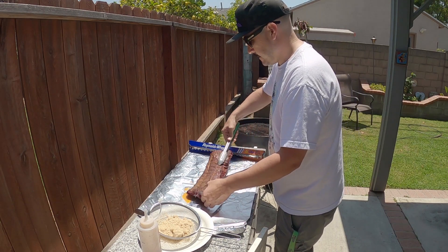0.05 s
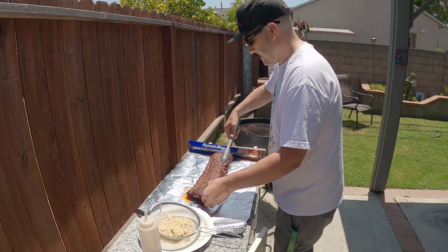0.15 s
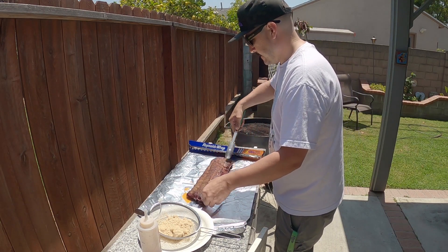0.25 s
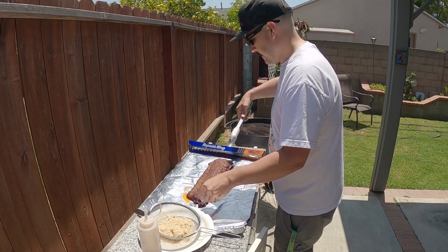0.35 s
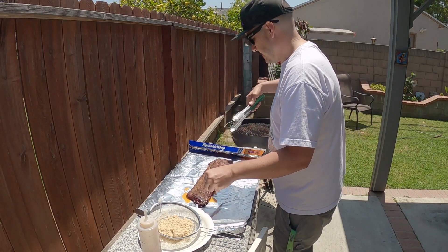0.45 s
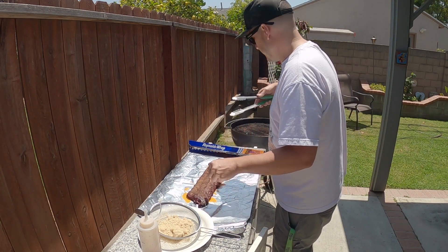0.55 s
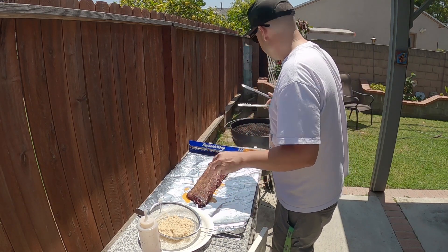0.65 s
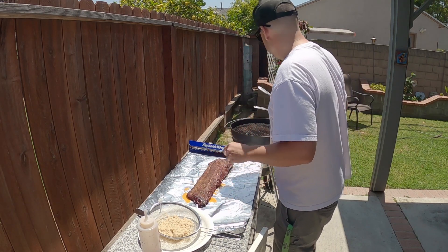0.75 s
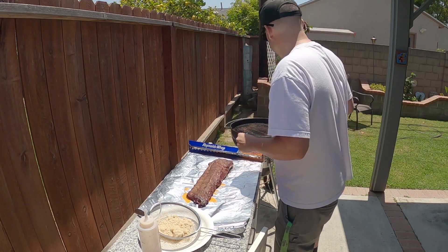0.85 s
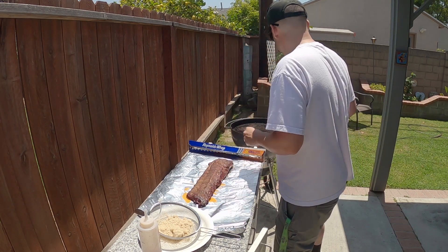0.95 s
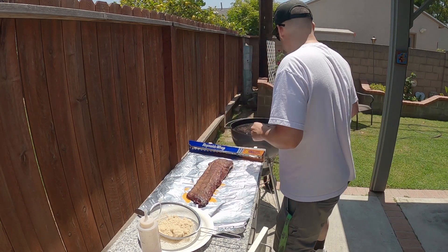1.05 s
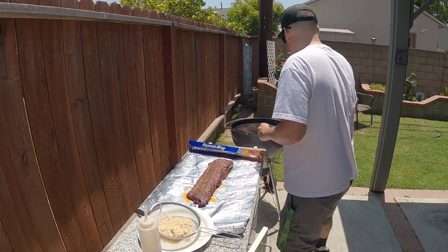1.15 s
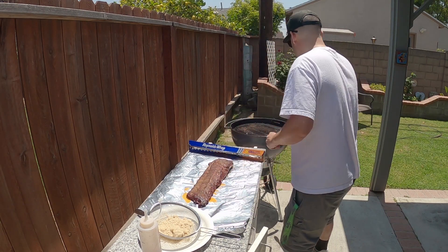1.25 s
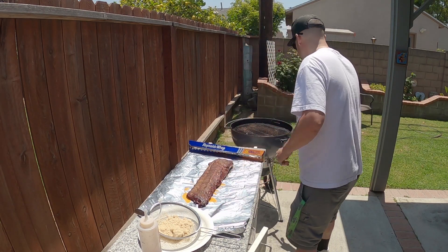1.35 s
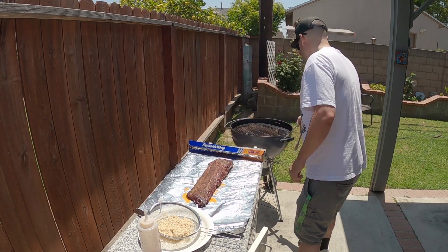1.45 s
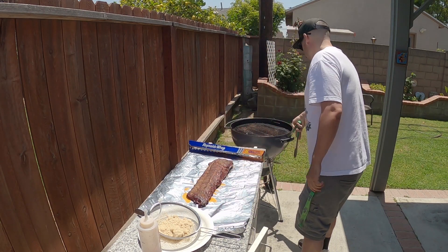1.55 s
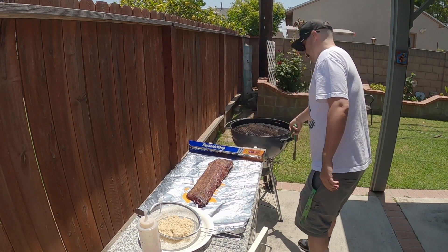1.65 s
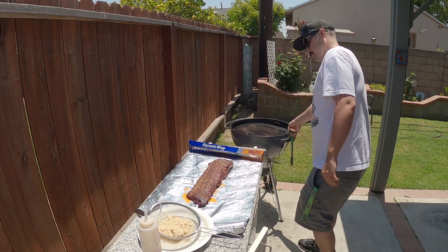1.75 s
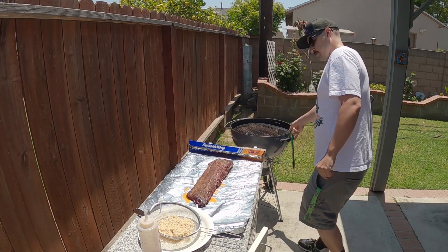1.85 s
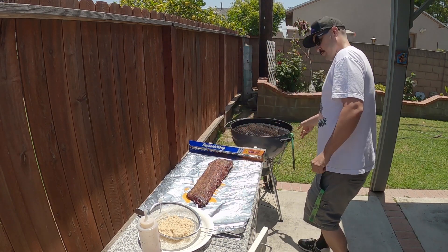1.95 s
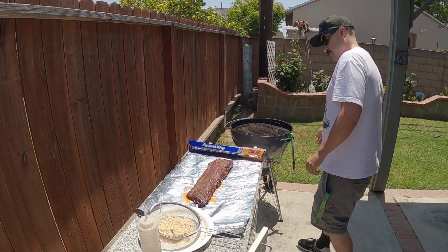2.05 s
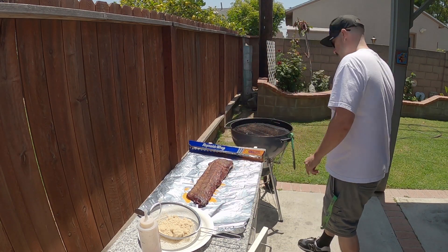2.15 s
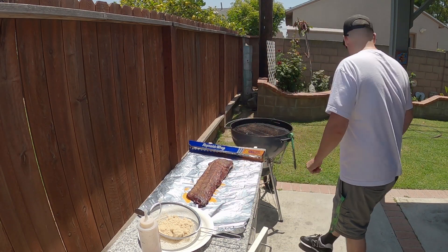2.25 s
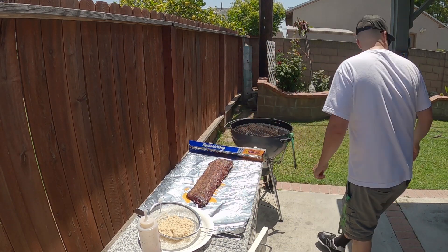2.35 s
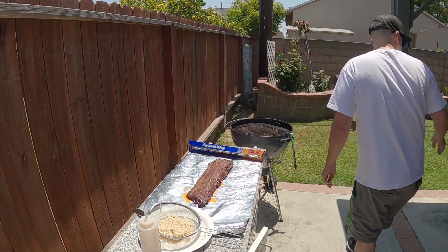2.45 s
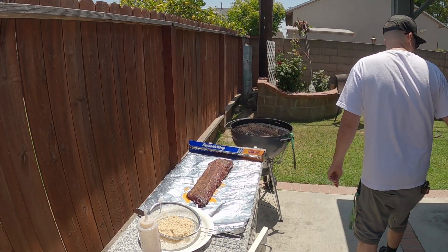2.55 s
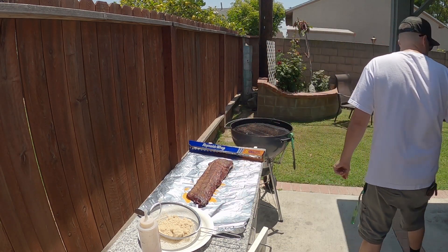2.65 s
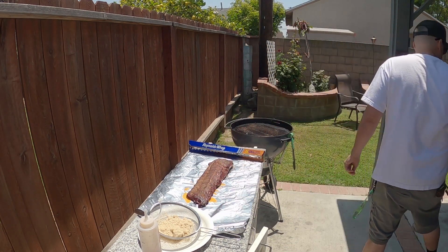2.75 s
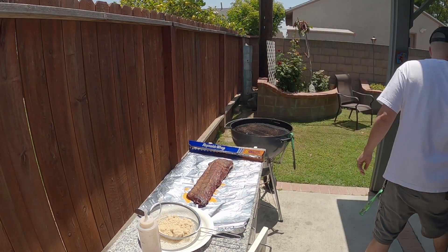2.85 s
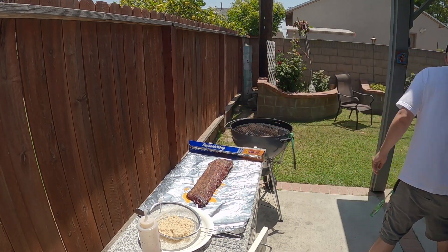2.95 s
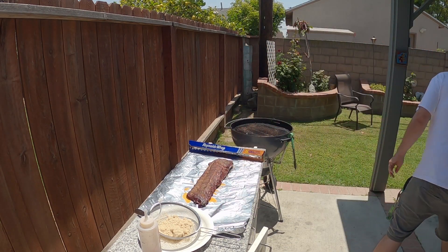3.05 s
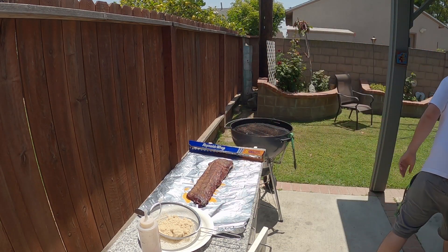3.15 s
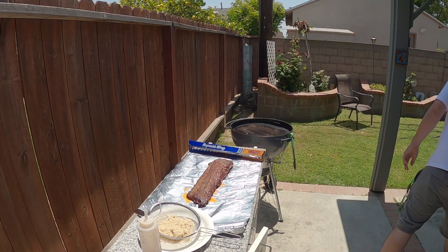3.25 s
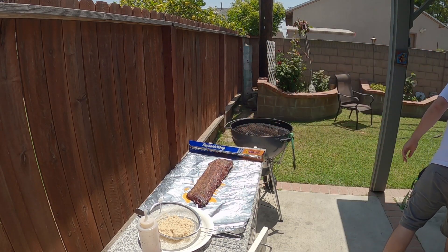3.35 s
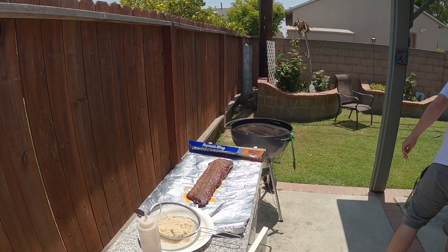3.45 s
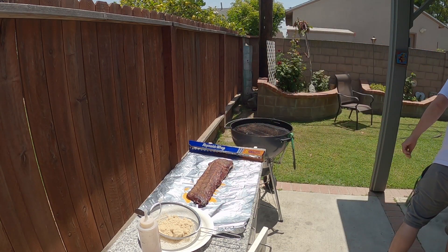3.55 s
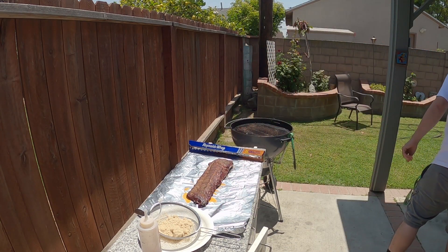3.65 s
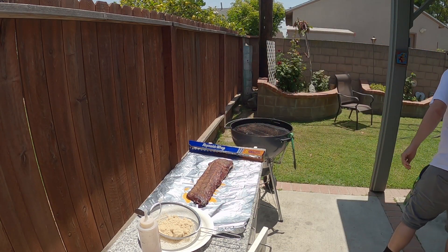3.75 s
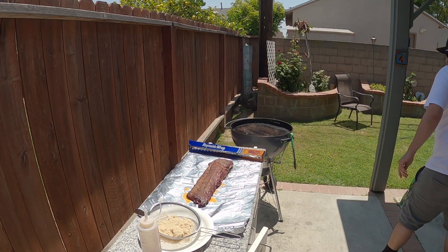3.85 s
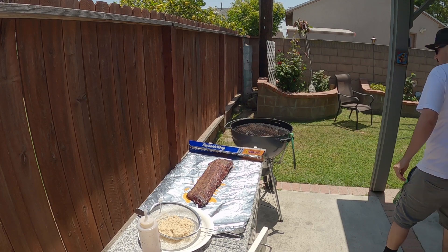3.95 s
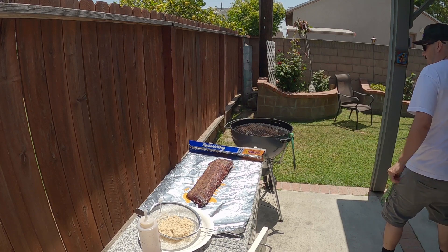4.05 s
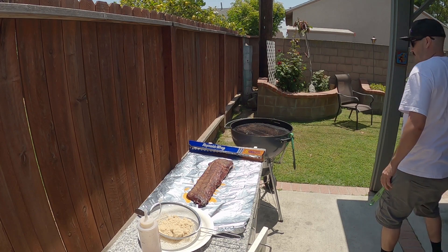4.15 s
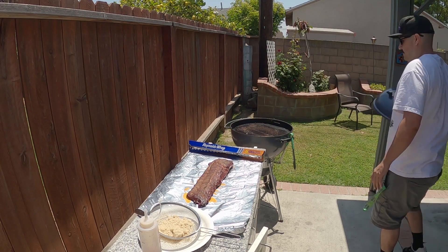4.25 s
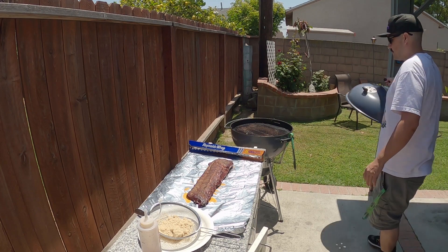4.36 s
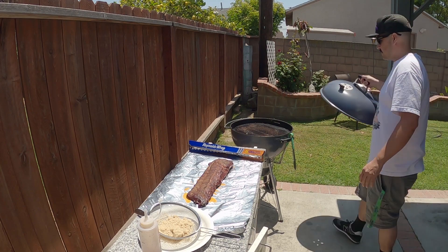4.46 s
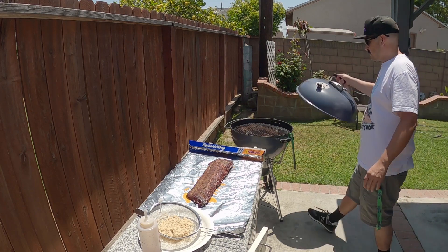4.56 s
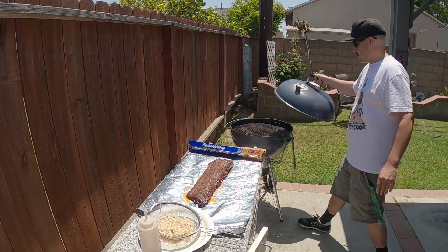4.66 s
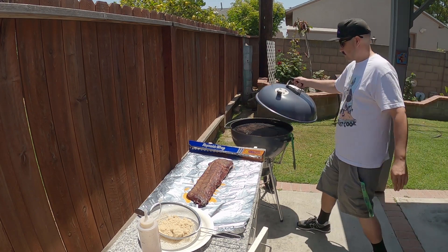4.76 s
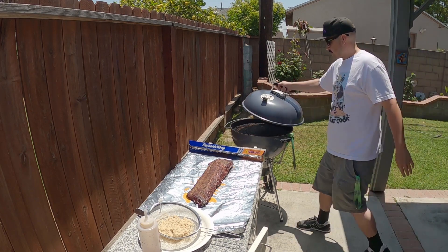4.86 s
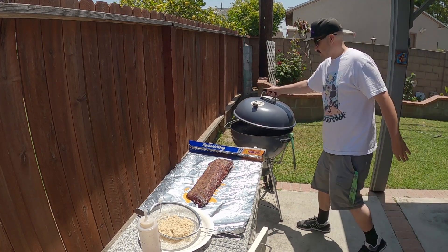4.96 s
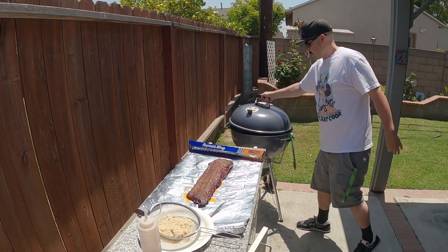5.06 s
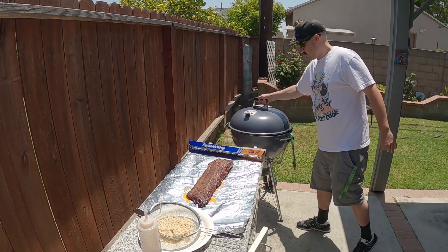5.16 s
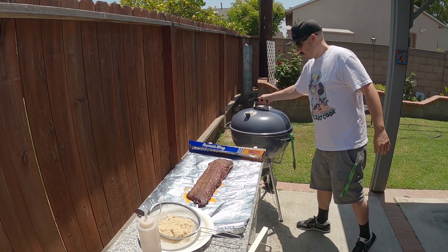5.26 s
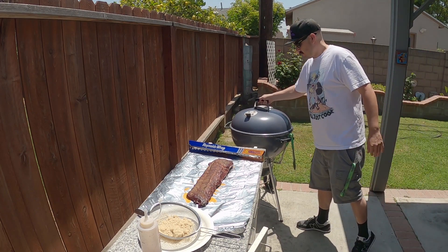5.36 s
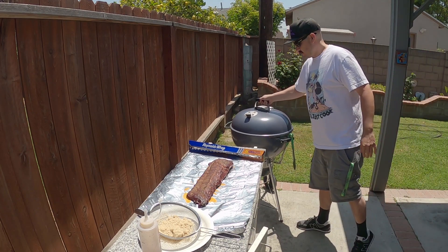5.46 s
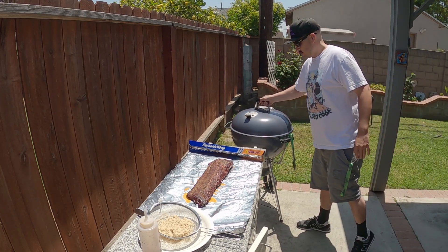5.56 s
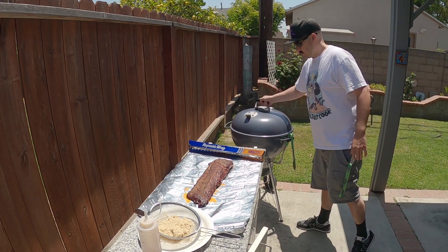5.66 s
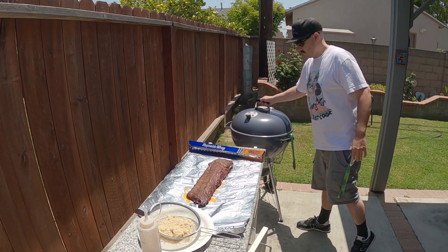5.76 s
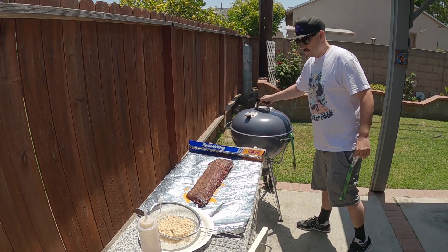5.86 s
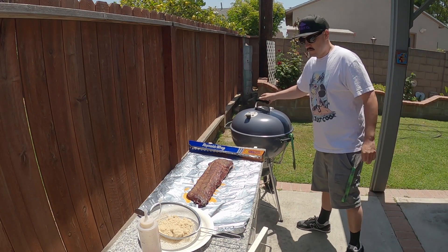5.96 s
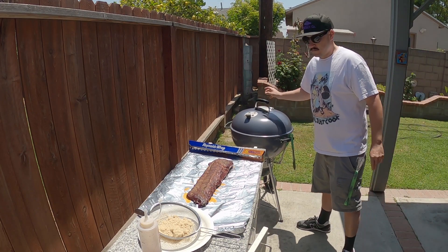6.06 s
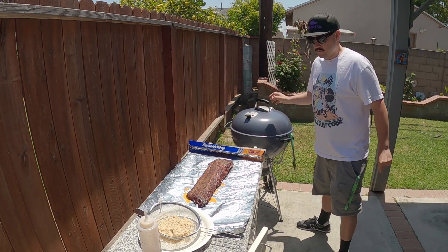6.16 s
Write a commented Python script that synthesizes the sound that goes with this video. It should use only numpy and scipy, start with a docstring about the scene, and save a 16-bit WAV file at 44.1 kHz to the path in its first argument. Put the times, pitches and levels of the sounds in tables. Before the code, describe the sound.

A short crinkle and scrape of foil is followed by a cluster of light, ringing clinks from tongs touching a grill. A quieter stretch holds only soft shoe and clothing scuffs and the low outdoor hum of far traffic and a machine. Then comes the loudest sound, a metal lid clanking onto the grill, rattling on its rim and rubbing faintly into place. The microphone is nearby on a patio.

```python
"""A backyard beside a wooden fence, a close-set microphone pair near a kettle grill. Foil crackles under
a piece of meat and a blade drags over it; steel tongs are hung on the grill and clink, ringing grate
and bowl. Shoes and cloth scuff softly, then the steel lid lands on the bowl, rocks on its rim and
settles. Distant traffic, a machine and air hum throughout; fence and patio throw back a short echo."""
import sys
import numpy as np
from scipy import signal
from scipy.fft import rfft, irfft
from scipy.io import wavfile
from scipy.ndimage import uniform_filter1d

SR = 44100
rng = np.random.default_rng(int(sys.argv[2]) if len(sys.argv) > 2 else 0)


def to_wav(sig):
    """Store sig (one row per channel, or 1-D mono) as 16-bit WAV at the path in sys.argv[1].

    Samples outside -1..1 are clipped; the rate is SR.
    """
    pcm = np.clip(np.atleast_2d(sig), -1, 1) * 32767
    pcm = np.round(pcm).astype(np.int16)
    wavfile.write(sys.argv[1], SR, pcm.T)  # frames by channels


N = 273930

# Far traffic and air. Each row: frequency in Hz, relative level in dB.
AIR_SPECTRUM = [(12, -41), (20, -4), (64, -1), (174, -11), (249, -13), (310, -19.5), (497, -21.5),
                (603, -25), (674, -26), (1310, -26), (6360, -47), (10500, -64.5), (12400, -70),
                (13400, -96), (15000, -100)]
# Traffic swelling and sinking. Each row: time in seconds, level in dB (about half the swing is used).
TRAFFIC_LEVEL = [(0.0, -30.5), (0.79, -32), (1.76, -30), (3.32, -29.5), (3.6, -30), (4.1, -29),
                 (5.3, -29.5), (5.91, -33.5), (6.21, -31.5)]
# The air at the two microphones. Each row: frequency in Hz, left-right likeness (below 0 counts as 0).
AIR_LIKENESS = [(60, 1), (180, 0.98), (550, 0.95), (1650, 0.74), (4970, 0.86), (15000, -1.2)]
# Phase of the air. Each row: frequency in Hz, lead of the left side in radians.
AIR_LEAD = [(60, 0.12), (3000, -0.24), (8000, 0.11)]
# Balance of the air. Each row: frequency in Hz, left minus right in dB.
AIR_BALANCE = [(60, 0.5), (1000, -2), (4000, 2), (15000, -0.5)]
# A distant machine. Each row: frequency in Hz, width in Hz, height over the air in dB.
MACHINE_HUM = [(41.88, 4.54, 9.), (81.6, 3.8, 3.5), (256.1, 7.2, 9), (605, 18, 8)]
# Rustling foil. Each row: frequency in Hz, relative level in dB.
FOIL_SPECTRUM = [(240, -35), (400, 1), (481, -16), (519, -13), (738, -8), (1150, 10.5), (1630, -2),
                 (3790, 3.5), (7790, -7), (15500, -33.5)]
# The foil is pushed, then the blade drags.
# Each row: peak time in seconds, level in dB, rise and fall in dB per second.
FOIL_PUSHES = [(0.0, -40.5, 200, 120), (0.085, -40, 150, 350), (0.198, -44.5, 160, 70),
               (0.28, -44, 1000, 360), (0.333, -36.5, 250, 450), (0.428, -32, 340, 394),
               (0.528, -17, 265, 328), (0.574, -32.5, 300, 150)]
# Single creases snapping. Each row: start in seconds, level in dB, centre in Hz.
CREASE_SNAPS = [(0.015, -26, 3480), (.058, -40, 7000), (.091, -39, 7950), (0.14, -33, 4000),
                (0.165, -33, 5000), (.188, -22.5, 4570), (0.216, -26, 4100), (.276, -26, 7500),
                (.308, -36, 4000), (0.32, -25, 5030), (.379, -34, 2000), (.395, -32, 7000),
                (0.41, -23.5, 2000), (0.47, -18, 4000), (0.483, -15, 5040), (.504, -10, 1470),
                (.528, -14, 4000)]
# Tongs touching the grill. Each row: start in seconds, crack level in dB, crack centre in Hz,
# then in dB the tongs' level, the boosts of their arm mode and tips, the grate's level, the bowl's level.
TONG_TOUCHES = [(1.527, -38, 2880, -59, 0., 0., -56, -65), (1.685, -24, 6100, -57.5, 6., 8., -33, -39),
                (1.705, -32, 4000, -70, 0., 0., -41.5, -46), (1.73, -44, 1200, -70, 0., 0., -42.5, -39),
                (1.752, -35, 8000, -57, 36., 20, -47, -57), (1.792, -27, 4440, -39, 11, -11, -44, -34),
                (1.815, -42, 3000, -44, 11, -14, -55, -41), (1.926, -25.5, 6000, -19, -1.5, -3.5, -53, -63),
                (1.978, -30.5, 1200, -72, 0., 0., -45, -36), (1.987, -25, 7000, -26, 11, -11., -55, -43),
                (2.03, -48, 800, -70, 0., 0., -55, -33.5), (2.045, -35, 700, -70, 0., 0., -60, -29.5),
                (2.075, -38, 700, -61, 0., 0., -59, -35), (2.1, -38, 600, -70, 0., 0., -58, -39)]
# Modes of tongs, grate and bowl. Each row: frequency in Hz, level in dB, t60 in seconds.
TONG_MODES = [(2600, -20, .08), (2630, -10, 0.14), (2920, -0.5, 0.069), (3040, -5, 0.19), (3115, -4, 0.16),
              (3187, 7, 0.049), (3306, -4, 0.05), (3550, -22, 0.13), (4630, -25.5, 0.35), (6900, -19, 0.18),
              (7460, -31, .1), (9500, -36, 0.13), (10800, -46, .06)]
GRATE_MODES = [(1169, 6.5, 0.084), (1257, 5.5, 0.053), (1415, -3, 0.079), (1910, 2.5, 0.066),
               (2300, -17, 0.11), (2760, -10, 0.19), (3140, -18, 0.19), (3640, -3, .08), (3840, -10, 0.13),
               (4040, -5, 0.087), (4860, -23, .1), (5370, -5, .12), (6100, -18, .08), (8000, -16, 0.07)]
BOWL_MODES = [(207, 0.5, 0.3), (500, -2, 0.14), (570, -2.5, 0.2), (652, 0, 0.16), (770, 6, 0.11)]
# Shoes and cloth. Each row: start in seconds, level in dB, centre in Hz, length in seconds.
SOFT_SCUFFS = [(2.45, -59.5, 6000, .05), (3.088, -35, 1600, 0.0065), (3.244, -46.5, 5970, 0.072),
               (4.132, -46, 6000, .04), (4.265, -48, 7000, 0.022), (4.986, -43, 4900, 0.098),
               (5.253, -36, 1200, 0.032)]
# The lid striking the rim. Each row: start in seconds, then force, boom and treble in dB.
LID_BLOWS = [(5.3028, 2, -2.5, 7.5), (5.318, -12, 1, 11), (5.334, -8.5, 14, 6), (5.361, 3.5, 1, 4),
             (5.385, -4, 8, 0.), (5.41, -4, 11.5, -9), (5.446, -11, -9, 9), (5.459, -0.5, -14, -1),
             (5.472, -5, 9, -2), (5.497, -10.5, 9.5, -16), (5.525, -14., 6, -19)]
# Lid modes. Each row: frequency in Hz, t60 in seconds, levels in dB when struck at rim places 0, 1, 2.
LID_MODES = [(140, 0.29, -26, -17.5, -15.5), (175.3, 0.33, -7, -20, -20.5), (195, 0.23, -12.5, -17.5, -19),
             (272.3, 0.2, -19, -9, -31), (346, 0.087, -10.5, -18, -24), (475.6, 0.11, -11.5, -19.5, -23),
             (605, 0.053, -17, -20, -47), (806.5, 0.22, -32, -29, -22), (974, 0.32, -38, -27, -32.5),
             (1238, 0.45, -43, -49, -29.5), (1437, 0.4, -57, -27, -27), (1607, 0.2, -48, -31, -30),
             (1663, 0.58, -45, -37, -21), (1833, 0.28, -24.5, -31, -40), (1939, 0.6, -36, -15, -33),
             (1954, 0.45, -39, -22, -32), (2200, 0.41, -30, -29.5, -42), (2440, 0.16, -16.5, -25.5, -41),
             (2667, 0.53, -32, -31, -37), (2730, 0.28, -34, -35, -47), (2930, 0.53, -34, -23, -28.5),
             (3040, 0.23, -22, -37, -45), (3080, 0.068, -31, -40, -17), (3140, 0.21, -23, -29, -43),
             (3430, 0.33, -30, -34, -38), (3623, 0.18, -31, -37, -28.5), (3840, 0.3, -37, -31, -39),
             (4104, 0.37, -27, -51, -40), (4800, 0.23, -32, -43.5, -50), (5180, 0.17, -37, -40, -50),
             (5380, .08, -29, -41, -33), (5540, .05, -36, -48, -28), (5720, .08, -35, -45, -34),
             (5940, 0.19, -42, -46, -45), (6150, 0.22, -38, -48, -45)]
# The crash, the lid's crowd of weaker modes. Each row: frequency in Hz, relative level in dB.
CRASH_SPECTRUM = [(190, -33), (330, 2), (971, -19), (1040, -16.5), (1910, -11), (2320, -12), (3050, -5),
                  (4340, -19.5), (5350, -21.5), (15500, -57)]
# Decay of the crash. Each row: frequency in Hz, t60 in seconds.
CRASH_T60 = [(150, 0.47), (500, 0.16), (1500, 0.44), (3000, 0.2), (6000, 0.23), (12000, 0.2)]
# Rims grinding. Each row: peak time in seconds, level in dB, rise and fall in dB per second.
RIM_RUBS = [(5.5, -52, 400, 110), (5.66, -52.5, 60, 44), (5.728, -45, 900, 100), (5.765, -43, 200, 400)]
# Colour of the microphone pair. Each row: frequency in Hz, left minus right in dB.
MIC_BALANCE = [(60, 0.9), (300, 1), (2400, 1.), (5000, -1), (9000, -1)]
# Phase of the pair. Each row: frequency in Hz, lag of the left side in radians.
MIC_LAG = [(300, 0.058), (3000, 0.64), (5500, 1.51), (9000, 0.63), (12000, 1.5)]

BRIGHTEN, PLAIN_DB = 0.24, -39.5  # louder rustle is brighter: dB per octave for each dB over PLAIN_DB
TONGS_FREE_S, GRILL_FREE_S, LID_FREE_S = 0.057, .04, 0.082  # free ring before contact chokes it
FIRST_PLACE, ROLL_PER_S = 0.25, 10.8  # the lid's contact rolls round the rim towards place 2
CRASH_DB, CRASH_SHARE = -12.5, 0.31  # the share is dB of crash for each dB of force
SEATED_S, CRASH_FALL_DB_PER_S = 5.465, 300  # the crash fades once the lid is seated
KNOCK_DB, KNOCK_HZ, KNOCK_T60_S = -11, 480, 0.036  # the dull knock of rim on rim
SNAP_T60_S = 0.042
BASS_CUT_HZ, BAND_LIMIT_HZ = 20.0, 15750


def amp(db):
    """Decibels to gain."""
    return 10 ** (np.asarray(db) / 20)


def unit(x):
    """Scales to rms 1."""
    return x / np.sqrt(np.mean(x ** 2) + 1e-20)


def read(points, hz):
    """A spectrum table read on a log-frequency axis."""
    f, value = np.transpose(points)
    return np.interp(np.log(hz + 1), np.log(f + 1), value)


def add(mix, s, sound):
    """Mixes a sound in at time s."""
    part = mix[round(s * SR):][:len(sound)]
    part += sound[:len(part)]


def hump(centre_hz, narrow_db):
    """A dB curve round one pitch, about narrow_db down an octave away, steeper in the top treble."""
    return lambda f: -narrow_db * np.log2(f / centre_hz + 0.015) ** 2 - 13.3 * (f / 10000) ** 2


def swells(rows, t):
    """Level in dB of overlapping swells, each rising and falling at its own speed."""
    at, db, rise, fall = np.transpose(rows)[:, :, None]
    gains = amp(db - np.maximum(rise * (at - t), fall * (t - at)))
    return 10 * np.log10(np.sum(gains ** 2, axis=0) + 1e-30)


def burst(shape_db, t60, seconds):
    """Coloured noise that starts at once and dies away; t60 is one time or a table of (Hz, seconds)."""
    t = np.arange(round(seconds * SR)) / SR
    hz, frame_s, z = signal.stft(rng.standard_normal(len(t)), SR, nperseg=256, noverlap=192)
    band_t60 = t60 if np.isscalar(t60) else read(t60, hz)[:, None]
    z = z * unit(amp(shape_db(hz)))[:, None] * amp(-60 * frame_s / band_t60)
    noise = signal.istft(z, SR, nperseg=256, noverlap=192)[1][:len(t)]
    return noise * np.minimum(t / 0.0015, 1) / 1.92  # peaks near 1


def ring(hz, db, t60, free_s, choked_t60, rise_s=0.00052):
    """Decaying modes struck together, neighbours in opposite sense, choked after free_s."""
    t = np.arange(round(.6 * SR)) / SR
    modes = amp(db - 60 * t[:, None] / t60) * np.sin(2 * np.pi * hz * t[:, None])
    signs = (-1.) ** np.arange(len(hz))
    choke = amp(-60 * np.maximum(t - free_s, 0) / choked_t60)
    return (modes @ signs) * choke * np.minimum(t / rise_s, 1)


def yard_air():
    """Far traffic, air and machine hum: drifting noise, its bass nearly alike at both microphones."""
    frames, hz = N // 1024 + 9, np.fft.rfftfreq(8192, 1 / SR)
    left_re, left_im, apart_re, apart_im, patches = rng.standard_normal((frames, 4097, 5)).T
    left, apart = left_re + 1j * left_im, apart_re + 1j * apart_im
    alike = np.clip(read(AIR_LIKENESS, hz), 0, 1)[:, None]
    right = alike * left * np.exp(-1j * read(AIR_LEAD, hz))[:, None] + np.sqrt(1 - alike ** 2) * apart
    side = amp(read(AIR_BALANCE, hz) / 2)[:, None]
    hum_db = sum(db / (1 + (2 * (hz - f) / width) ** 2) for f, width, db in MACHINE_HUM)
    colour_db = (read(AIR_SPECTRUM, hz) + hum_db)[:, None]
    drift_db = 1.06 * unit(uniform_filter1d(uniform_filter1d(patches, size=40, axis=0), size=5, axis=1))
    at, level_db = np.transpose(TRAFFIC_LEVEL)
    swell_db = np.interp(np.arange(frames) * 1024 / SR, at, level_db - level_db.mean())
    share = read([(200, 0.56), (1000, 0.42)], hz)[:, None]  # the rumble swells most
    z = np.array([left * side, right / side]) * amp(colour_db + drift_db + share * swell_db)
    return amp(level_db.mean()) * unit(signal.istft(z, nperseg=8192, noverlap=7168)[1][:, :N])


def foil():
    """Foil under meat and blade: a dense spray of tiny uneven crackles, and single creases snapping."""
    out, n = np.zeros(N), SR
    spray = rng.standard_normal(n) * amp(2.6 * np.minimum(rng.exponential(1, n), 4))
    spray *= rng.random(n) < 12000 / SR  # crackles per second
    hz, t, z = signal.stft(unit(spray), SR, nperseg=128)
    tilt_db = BRIGHTEN * np.maximum(swells(FOIL_PUSHES, t) - PLAIN_DB, -25)
    colour = amp(read(FOIL_SPECTRUM, hz)[:, None] + np.log2(hz[:, None] / 4000 + 0.13) * tilt_db)
    z = z * colour / np.sqrt(np.mean(colour ** 2, axis=0))
    rustle = signal.istft(z, SR, nperseg=128)[1][:n]
    add(out, 0, rustle * amp(swells(FOIL_PUSHES, np.arange(n) / SR)))
    for at, db, centre_hz in CREASE_SNAPS:
        add(out, at, amp(db) * burst(hump(centre_hz, 5.4), SNAP_T60_S, seconds=.15))
    return out


def tongs():
    """Each touch is a short crack that rings the tongs, the grate and the bowl by different amounts."""
    out = np.zeros(N)
    hz, db, t60 = np.transpose(TONG_MODES)
    grate = ring(*np.transpose(GRATE_MODES), GRILL_FREE_S, choked_t60=.1)
    # the heavy bowl wakes slowly
    bowl = ring(*np.transpose(BOWL_MODES), GRILL_FREE_S, choked_t60=0.11, rise_s=0.0064)
    for at, crack_db, crack_hz, tongs_db, arm_db, tips_db, grate_db, bowl_db in TONG_TOUCHES:
        boost_db = read([(3600, 0), (4600, arm_db), (6800, tips_db)], hz)
        clink = ring(hz, tongs_db + db + boost_db, t60, TONGS_FREE_S, choked_t60=.07)
        crack = burst(hump(crack_hz, 3.6), [(1000, 0.31), (5000, 0.093), (11000, 0.038)], seconds=.3)
        add(out, at, clink + amp(grate_db) * grate + amp(bowl_db) * bowl)
        add(out, at, amp(crack_db) * crack)
    return out


def scuffs():
    """Shoes and cloth near the microphones: faint brushes of noise that swell and fade."""
    out = np.zeros(N)
    for at, db, centre_hz, length in SOFT_SCUFFS:
        brush = burst(hump(centre_hz, 9.8), t60=3 * length, seconds=.3)
        fade_in = np.minimum(np.arange(len(brush)) / SR / (0.25 * length), 1)
        add(out, at, amp(db) * brush * fade_in)
    return out


def lid():
    """Each blow rings the modes that move most where the rims meet, with a crash and a dull knock."""
    out = np.zeros(N)
    hz, t60, *places_db = np.transpose(LID_MODES)
    for at, force_db, boom_db, treble_db in LID_BLOWS:
        place = np.clip(FIRST_PLACE + ROLL_PER_S * (at - LID_BLOWS[0][0]), 0, 2)
        nearness = np.maximum(1 - abs(place - np.arange(len(places_db))), 0)
        treble = [(280, 0), (3000, 0), (6000, treble_db)]
        modes_db = force_db + nearness @ places_db + read([(200, boom_db)] + treble, hz)
        add(out, at, ring(hz, modes_db, t60, LID_FREE_S, choked_t60=0.099))
        crash_db = CRASH_DB + CRASH_SHARE * force_db - CRASH_FALL_DB_PER_S * max(at - SEATED_S, 0)
        crash = burst(lambda f: read(CRASH_SPECTRUM, f) + read(treble, f), CRASH_T60, seconds=.6)
        add(out, at, amp(crash_db) * crash)
        knock = burst(hump(KNOCK_HZ, 10.0), KNOCK_T60_S, seconds=.15)
        add(out, at, amp(KNOCK_DB + force_db + min(boom_db, 0)) * knock)
    return out


def rim_grind(start_s=5.4):
    """The rims rub as the lid settles and is nudged: swells of noise with a resonance at 3050 Hz."""
    out = np.zeros(N)
    rub = burst(lambda f: hump(2800, 6.0)(f) + 6.5 / (1 + ((f - 3050) / 250) ** 2), 1e3, seconds=0.52)
    level_db = swells(RIM_RUBS, start_s + np.arange(len(rub)) / SR)
    add(out, start_s, unit(rub) * amp(level_db))
    return out


def patio_echo(x, decay_s):
    """Sparse echoes off fence, slab and wall, different on each side; the mids last about decay_s."""
    taps = np.zeros((2, SR // 2))
    slots = np.arange(200, SR // 2 - 20, 20)
    arrivals = slots + rng.integers(0, 20, (2, len(slots)))
    np.put_along_axis(taps, arrivals, rng.choice([-1., 1.], arrivals.shape), 1)
    hz, t, z = signal.stft(taps, SR, nperseg=256)
    t60 = decay_s * read([(300, 0.45), (2000, 0.97), (10000, 0.69)], hz)[:, None]
    bass_cut = amp(read([(150, -12.5), (1500, 1.5), (8000, 5.0)], hz))[:, None]  # keeps the bass centred
    tail = signal.istft(z * bass_cut * amp(-60 * t / t60), SR, nperseg=256)[1]
    return signal.fftconvolve(x[None], tail / np.linalg.norm(tail[0]), axes=1)[:, :N]


def scene():
    """Near sounds in the centre, their echo round them, the yard's air behind."""
    rustles = foil() + scuffs()
    steel = tongs() + lid() + rim_grind()
    echo = amp(-9.5) * patio_echo(rustles, decay_s=0.31) + amp(-6.0) * patio_echo(steel, decay_s=0.34)
    return rustles + steel + echo + yard_air()


def record(dry):
    """Two close-set microphones unlike in colour and phase, clipping at full scale, then a band limit."""
    hz, sides = np.fft.rfftfreq(N, 1 / SR), np.array([[.5], [-.5]])
    pair = amp(sides * read(MIC_BALANCE, hz)) * np.exp(-1j * sides * read(MIC_LAG, hz))
    bass_cut = 1 / np.sqrt(1 + (BASS_CUT_HZ / (hz + 1)) ** 6)  # the capsules lose the deepest rumble
    clipped = np.clip(irfft(rfft(dry) * pair * bass_cut, N), -1, 1)
    lowpass = signal.firwin(511, BAND_LIMIT_HZ, window=("kaiser", 9), fs=SR)
    return signal.oaconvolve(clipped, lowpass[None], "same")


dry = scene()
out = record(dry)
to_wav(out)
```